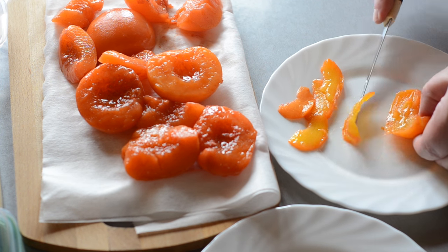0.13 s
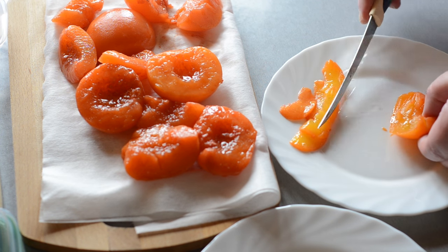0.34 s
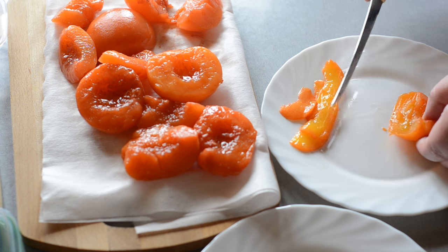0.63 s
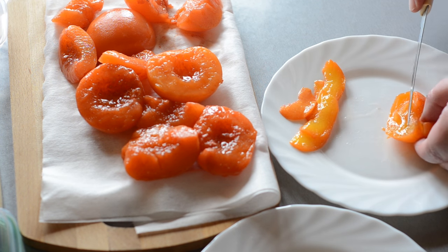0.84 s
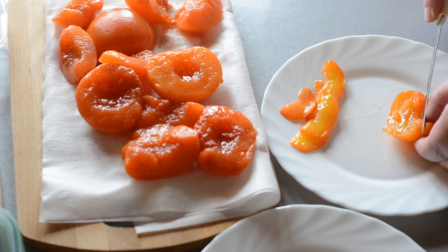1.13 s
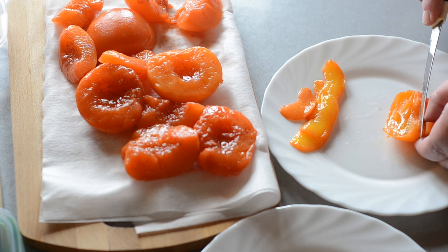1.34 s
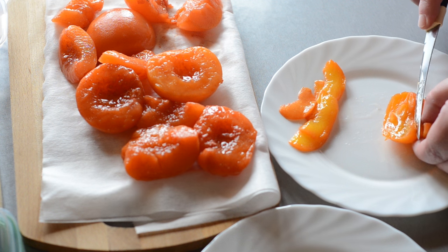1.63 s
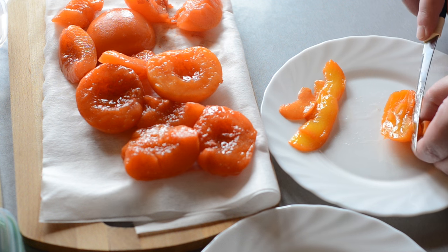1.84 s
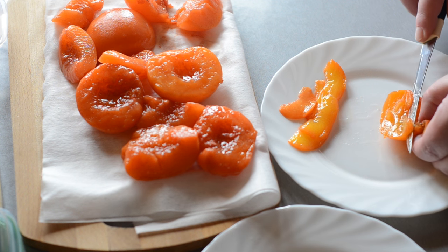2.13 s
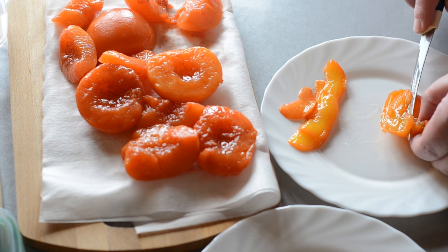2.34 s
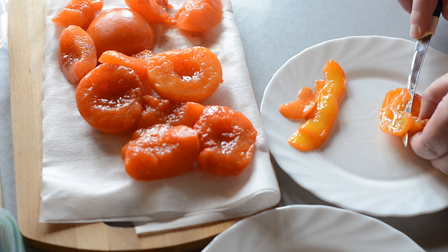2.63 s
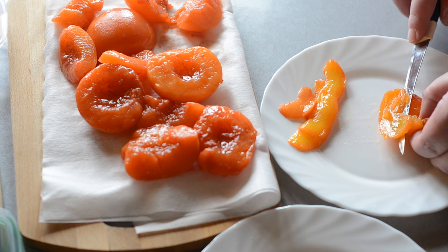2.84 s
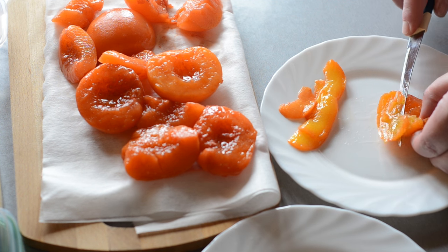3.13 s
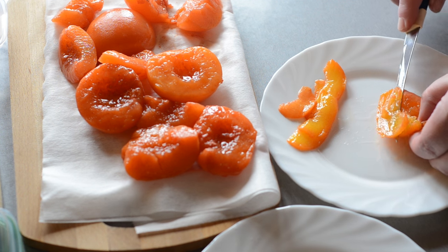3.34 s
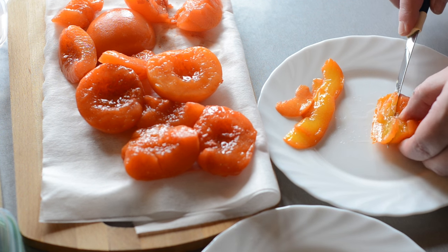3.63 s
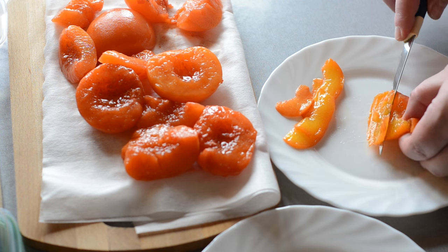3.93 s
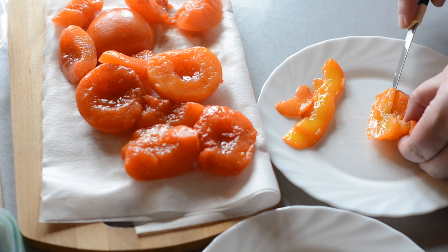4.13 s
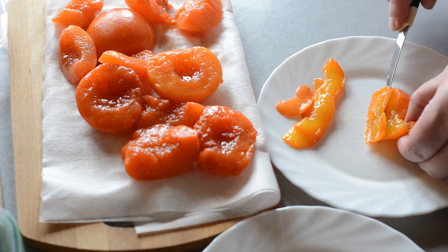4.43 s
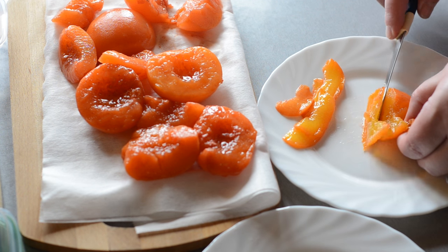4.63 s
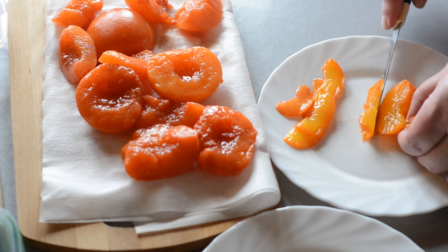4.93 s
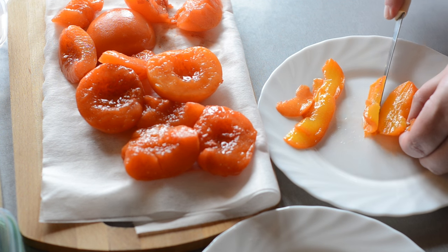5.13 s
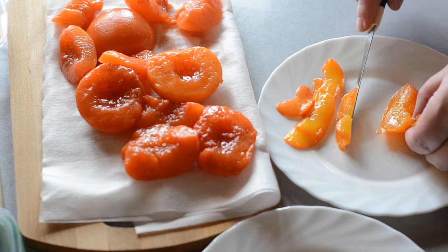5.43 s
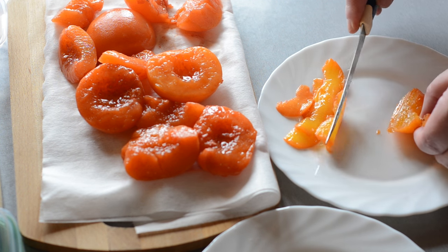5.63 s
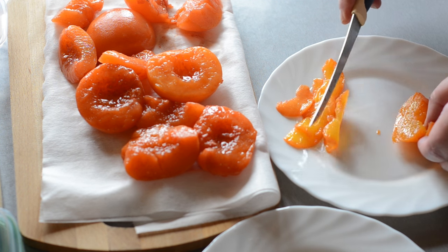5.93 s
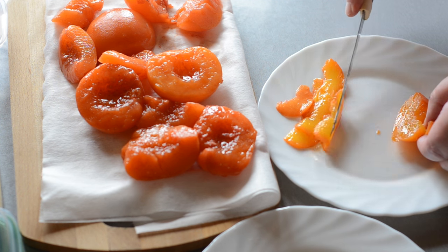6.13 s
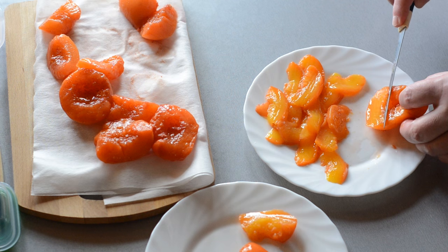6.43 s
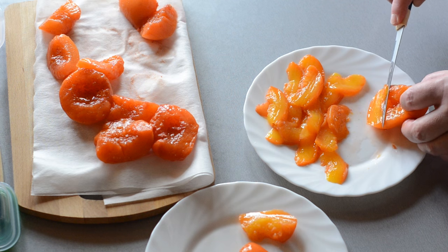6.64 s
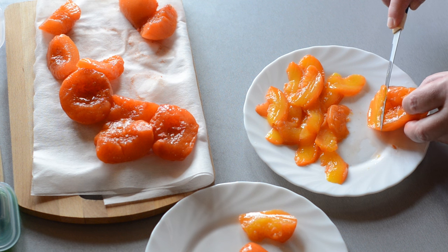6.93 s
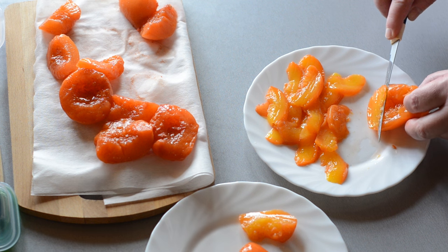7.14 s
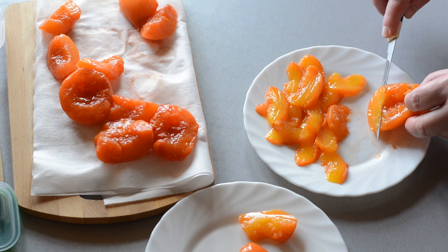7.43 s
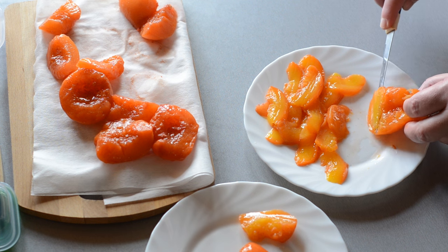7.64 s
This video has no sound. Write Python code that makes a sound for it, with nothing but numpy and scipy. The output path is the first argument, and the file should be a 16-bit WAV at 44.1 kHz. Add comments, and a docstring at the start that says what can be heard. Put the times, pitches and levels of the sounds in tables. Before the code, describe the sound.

Close up in a small quiet kitchen, a knife blade clinks on a ceramic plate and scrapes briefly. Soft, wet sawing strokes follow in short rhythm, with a small clink midway. A loud, double-edged knock lands as the blade cuts through, then thin scrapes drag the slice aside. Quieter sawing resumes with tiny juicy clicks over smooth room hiss.

```python
"""Slicing soft fruit on a plate

A knife saws through soft fruit on a ceramic plate in a small quiet kitchen.
Blows are fading tones plus a thud; sawing and scraping are gritty noise, shaped or sent through resonances.
Juice clicks are very short tones, and a burst of random echoes makes the room.
Behind them lie smooth noise and a faint high whine; the recorder cuts narrow notches and the top treble."""
import sys
import numpy as np
from scipy import signal
from scipy.fft import rfft, irfft
from scipy.io import wavfile

SR = 44100
rng = np.random.default_rng(int(sys.argv[2]) if len(sys.argv) > 2 else 0)


def wrap_up_sound(samples):
    """Save the sound to the file named by the first command line argument, as 16-bit audio."""
    columns = np.atleast_2d(samples).T
    # keep every value between -1 and 1, then stretch to whole-number steps
    tamed = np.clip(columns, -1, 1)
    steps = np.round(tamed * 32767).astype(np.int16)
    wavfile.write(sys.argv[1], SR, steps)


N = 343098  # length in samples
LEAD = 4410  # samples kept before time zero, so that an earlier blow is already ringing

# Blows: the blade on the glaze rings the plate, and the plate on the counter thuds.
# Each row: start in seconds, ring level in dB, ring brightness in dB per octave,
# place struck (0 middle to 1 foot), damping by fruit and counter (a factor on the decay rate),
# crack level in dB before its filter, thud level in dB before the bass cut.
BLOWS = [(-.04, -31.5, 2.5, 0.4, 1.1, -24, -20), (.021, -34, -4, 1, 1.5, -55, -21.5),
         (.026, -26, -6, 0.57, 2.5, -60, -14), (.047, -42.5, -6, 0.38, 1.1, -58, -42),
         (1.7037, -41.5, -1.8, 0.27, 1.5, -66, -35), (3.2735, -27.5, 0, 0.12, .9, -24, -22),
         (3.279, -48, 3.5, 0.037, .9, -55, -26), (3.8955, -39.5, -1.6, 0.24, 1.5, -63, -36),
         (4.5684, -25.5, 1.5, 0.39, 1.3, -17, -12.5), (4.582, -41, 4.5, .6, 1.1, -30, -12.5),
         (4.6551, -23, -0.5, 0.75, 2.5, -29, -0.5), (4.660, -13, -6, 0.73, 3.5, -51, -4.5),
         (4.677, -31, 2, 0.64, 1.5, -33, -11), (4.683, -26, -1, 0.5, 1.5, -44, -4),
         (4.690, -26, -7, 0.91, 1.1, -52, -17), (4.715, -47, -4, 0.67, 1.1, -50, -42),
         (5.311, -57, -5.5, 0.29, 1.1, -61, -51)]
# The plate's modes, its natural tones. Each entry: pitch in Hz.
PLATE_HZ = [222, 269, 339, 453, 500, 620, 760, 853, 1060, 1165, 1365, 1423, 1622, 1800, 2033, 2205, 2842,
            3220, 3914, 4200, 4700, 5075, 5230, 6420, 7630, 7860, 9060, 9410, 11150, 13000]
# How those modes answer, in the same order. Each row: relative level in dB struck in the middle,
# relative level in dB struck at the foot, seconds to fade by 60 dB before damping.
PLATE_MODES = [(-21, -30, 0.57), (-19.5, -28.5, 0.44), (-10, -13.5, 0.086), (-10, -12, 0.32),
               (0, -7.5, 0.11), (3.5, 1, 0.061), (2, 0.5, 0.075), (-12, -3.5, 0.2), (-14.5, -27, 0.14),
               (5.5, -9.5, 0.039), (-7, -9, 0.11), (-0.5, 9.5, 0.039), (-3.5, -7, 0.029), (-5, -8, 0.027),
               (4.5, 3.5, 0.031), (-16.5, -2.5, 0.057), (1, -1, 0.03), (-2, -12, 0.049), (-5.5, -48, 0.2),
               (-2, -6, 0.025), (-11.5, 4.5, 0.023), (-4, -16, 0.04), (-12, 9, 0.022), (-4.5, -2.5, 0.028),
               (-19, -11, 0.074), (-14, -6.5, 0.02), (-30, -11, 0.041), (-18.5, -26, 0.053),
               (-31, -30.5, 0.061), (-38, -52, 0.032)]
# Colour of the counter under a blow. Each row: frequency in Hz, relative level in dB.
THUD_COLOUR = [(100, -40), (200, -30.5), (400, -7.5), (800, 1.5), (1400, 3), (2100, 0.5), (2800, -8),
               (5000, -29), (9000, -42), (13000, -115)]
# How the kitchen's echoes fade. Each row: frequency in Hz, seconds to fade by 60 dB.
KITCHEN_FADE = [(200, 0.21), (700, 0.34), (2000, 0.29), (5000, 0.26), (10000, 0.16)]
# Colour of room tone and preamp hiss. Each row: frequency in Hz, relative level in dB.
AIR_COLOUR = [(10, -40.5), (22, -7), (38, -1), (52, -1.5), (90, 1), (150, -1), (300, -3), (600, 0),
              (1000, 0), (2000, -7), (4000, -13.5), (8000, -19), (12000, -27), (16000, -31)]
# The blade dragged sideways. Each row: time of full pressure in seconds, onset in seconds, fade in seconds,
# then levels in dB before mixing: edge chatter, mid-blade ring, squeak, ring near the handle.
SCRAPES = [(.072, 0.022, 0.16, -52, -52, -58.5, -60), (.163, 0.022, 0.066, -68, -70, -58.5, -56),
           (4.82, 0.051, 0.087, -60, -62, -60, -54), (4.99, .11, 0.051, -60, -61, -67, -60),
           (5.1, 0.065, 0.16, -61, -64, -67, -59), (5.26, .035, 0.066, -55, -55.5, -68, -58),
           (5.313, 0.02, 0.13, -54.5, -54.5, -56, -46.5), (5.455, 0.076, 0.078, -70, -62, -57.5, -64)]
# The blade's resonances. Each row: pitch in Hz, width in Hz of one filter pass, relative level in dB.
BLADE = [(1820, 490, -1), (1894, 490, 1), (3403, 840, -6), (3450, 340, -13.5), (4160, 900, 7),
         (4660, 500, 2.5), (5120, 880, 9), (6180, 160, -0.5), (7310, 150, 4.5), (7730, 400, -8),
         (7950, 380, 8), (10110, 450, -4), (10670, 120, -15)]
# Fading of the blade's four groups. Each entry: share of the drag's fade, in the order of the levels above.
LINGER = [1, 1.17, 1.08, 0.41]
# Wet clicks of juice and skin. Each row: start in seconds, level in dB, pitch in Hz, seconds to fade by 60 dB.
CLICKS = [(.061, -45, 8900, 0.0014), (1.864, -47, 7000, .003), (3.672, -34.5, 5500, 0.0016),
          (4.216, -34.5, 5540, 0.0033), (4.252, -32.5, 5100, .003), (4.2522, -52, 12000, 0.0011),
          (4.429, -48, 10600, 0.0026), (4.812, -40, 4700, .006), (5.454, -46, 3260, 0.029),
          (6.633, -57.5, 8150, 0.022), (6.8044, -45, 2500, 0.013), (6.807, -45.5, 2800, 0.053),
          (6.807, -48, 4020, 0.025), (6.874, -54, 7700, .004), (6.874, -52, 2300, .01),
          (6.889, -49, 2400, 0.016), (6.892, -53, 9700, .004)]
# Saw strokes through the flesh. Each row: time of full speed in seconds, speeding up in seconds,
# slowing down in seconds, hiss level in dB before mixing.
STROKES = [(.66, .09, 0.094, -71), (1.822, 0.028, 0.12, -62), (1.985, .035, 0.073, -61.5),
           (2.162, 0.075, 0.083, -62.5), (2.338, 0.084, 0.063, -63.5), (2.488, 0.045, .12, -64.5),
           (2.696, .09, 0.068, -62.5), (2.845, 0.056, 0.11, -64.5), (3.015, 0.09, 0.13, -64),
           (3.2, 0.077, 0.092, -61.5), (3.565, 0.11, 0.055, -63), (3.99, 0.058, 0.071, -67),
           (4.1, .05, 0.085, -58.5), (4.262, 0.049, 0.18, -60), (4.455, 0.069, 0.095, -53.5),
           (6.04, .1, .12, -72), (6.44, .06, 0.2, -66), (6.76, .03, 0.13, -64.5), (6.888, 0.032, .14, -66),
           (7.112, 0.062, .12, -66.5), (7.305, 0.09, .04, -66), (7.48, .12, 0.12, -64),
           (7.628, 0.037, 0.084, -70)]
# Colour of the sawn flesh. Each row: frequency in Hz, relative level in dB.
FLESH_COLOUR = [(900, -8), (1500, -5), (2300, -10), (4500, -13.5), (6500, -13.5), (8200, -12), (9500, -16),
                (11000, -27), (14000, -45)]
# Teeth reaching the glaze. Each row: time of full contact in seconds, onset in seconds, fade in seconds,
# level in dB before mixing.
RUBS = [(1.92, .025, 0.058, -60.5), (1.983, .025, 0.066, -60), (2.33, 0.044, .06, -71),
        (4.085, 0.019, 0.076, -54.5), (4.393, .015, .025, -58.5), (7.46, 0.043, 0.08, -69),
        (7.62, 0.026, .03, -67)]
# Notches at three whines. Each row: frequency in Hz, width in Hz, gain left at the centre.
WHINE_NOTCHES = [(5720, 480, 0.162), (6920, 160, .2), (14800, 450, 0.224)]


def gain_of(db):
    """Turns decibels into an amplitude factor."""
    return 10 ** (np.asarray(db) / 20)


def evened(x):
    """Scales a sound to an rms (average strength) of 1."""
    return x / np.sqrt(np.mean(x ** 2) + 1e-20)


def read(points, hz):
    """Reads a table's value at any frequency, with straight lines on a log-frequency axis."""
    f, value = np.transpose(points)
    return np.interp(np.log(hz + 1), np.log(f + 1), value)


def add(mix, s, sound):
    """Mixes a sound in at time s, in seconds."""
    part = mix[round(s * SR):][:len(sound)]
    part += sound[:len(part)]


def coloured(x, points):
    """Gives noise a spectrum, at rms 1."""
    hz = np.fft.rfftfreq(len(x), 1 / SR)
    return evened(irfft(rfft(x) * gain_of(read(points, hz)), len(x)))


def resonate(x, hz, width):
    """Passes a sound through one resonance, with gain 1 at its centre."""
    r = np.exp(-np.pi * width / SR)
    return 2 * signal.lfilter([1 - r], [1, -r * np.exp(2j * np.pi * hz / SR)], x).real


def ring_on(x, hz, width):
    """Passes a sound through the same resonance twice, at rms 1."""
    return evened(resonate(resonate(x, hz, width), hz, width))


def grit(spread_db):
    """Makes noise of uneven grains: the tiny catches of a sliding edge."""
    grain = 64  # samples
    grain_db = spread_db * np.repeat(rng.standard_normal(N // grain + 1), grain)[:N]
    return evened(rng.standard_normal(N) * gain_of(grain_db))


def swells(rows, linger=1, level_column=3):
    """Makes a gain over time: each movement rises along a squared sine to its peak and falls again."""
    t, out = np.arange(N) / SR, np.zeros(N)
    for row in rows:
        peak, rise, fall = row[:3]
        turn = np.interp(t, [peak - rise, peak, peak + fall * linger], [0, .5, 1])
        out += gain_of(row[level_column]) * np.sin(np.pi * turn) ** 2
    return out


def thud_pulse(size):
    """The counter's answer to one push: a pulse of the thud colour that starts at once, peak 1."""
    log_gain = read(THUD_COLOUR, abs(np.fft.fftfreq(size, 1 / SR))) * np.log(10) / 20
    pulse = np.fft.ifft(np.exp(signal.hilbert(log_gain).conj())).real  # nothing sounds before the push
    return pulse / abs(pulse).max()


def crack_noises(size):
    """Steel skids a moment on glaze: one short noise burst for each blow."""
    t = np.arange(size) / SR
    bursts = rng.standard_normal((len(BLOWS), size)) * gain_of(-60 * t / 0.009)  # gone in about 9 ms
    return signal.sosfilt(signal.butter(5, [2500, 9000], "band", fs=SR, output="sos"), bursts)


def blows():
    """Each blow sets off the plate's modes at the place struck, with a crack, and thuds in the counter."""
    t = np.arange(SR // 3) / SR
    ring, thud = out = np.zeros((2, N + LEAD))
    hz = np.array(PLATE_HZ)[:, None]
    middle_db, foot_db, t60 = np.transpose(PLATE_MODES)[:, :, None]
    contact_s = 0.0011
    contact = np.sin(np.pi / 2 * np.minimum(t / contact_s, 1)) ** 2  # the push builds up over the contact time
    pulse = thud_pulse(2048)
    spots_db = rng.standard_normal((len(BLOWS), len(PLATE_MODES), 1))  # each spot favours other modes
    for row, spot_db, crack in zip(BLOWS, spots_db, crack_noises(2048)):
        s, ring_db, bright_db, place, damping, crack_db, thud_db = row
        s = s + LEAD / SR
        place_db = middle_db + place * (foot_db - middle_db)
        mode_db = ring_db + place_db + bright_db * np.log2(hz / 1000) + spot_db
        modes = gain_of(mode_db - 60 * damping * t / t60) * np.sin(2 * np.pi * hz * t)
        add(ring, s, modes.sum(0) * contact)
        add(ring, s, gain_of(crack_db) * crack)
        add(thud, s, gain_of(thud_db) * pulse)
    bass_edge_hz = 215  # below this the plate is too small to radiate
    return signal.sosfilt(signal.butter(8, bass_edge_hz, "high", fs=SR, output="sos"), out)


def kitchen(x):
    """Sparse reflections of random sign answer each sound, each band fading at its own speed."""
    taps, gap = np.zeros(SR // 2), 20  # one reflection at random within every 20 samples
    at = np.arange(120, len(taps) - gap, gap)
    taps[at + rng.integers(0, gap, len(at))] = rng.choice([-1., 1.], len(at))
    hz, t, bands = signal.stft(taps, SR, nperseg=256)
    fade = gain_of(-60 * t / read(KITCHEN_FADE, hz)[:, None])
    tail = signal.istft(bands * fade, SR, nperseg=256)[1]
    return signal.oaconvolve(x, tail / np.linalg.norm(tail))[:len(x)]


def air():
    """Smooth room tone and hiss, with a faint electronic whine split into lines by the frame rate."""
    air_db, whine_hz, frame_hz = -60.5, 14970, 59
    t, k = np.arange(N) / SR, np.arange(-4, 8)[:, None]
    turns = (whine_hz + frame_hz * k) * t + rng.random(k.shape)
    whine = gain_of(-101 + 0.57 * abs(k - .5)) * np.sin(2 * np.pi * turns)
    return gain_of(air_db) * coloured(rng.standard_normal(N), AIR_COLOUR) + whine.sum(0)


def scrapes():
    """The dragged edge chatters into the blade's resonances; four groups answer by where the edge touches."""
    slip_db, slip_s = 1.5, 0.02  # the edge sticks and slips: typical depth, and how long a catch lasts
    slips = evened(signal.lfilter([1], [1, -np.exp(-1 / (slip_s * SR))], rng.standard_normal(N)))
    rub = grit(spread_db=1.5) * gain_of(slip_db * slips)
    rings = np.array([gain_of(db) * ring_on(rub, hz, width) for hz, width, db in BLADE])
    groups = np.split(rings, [2, 4, 7])[::-1]  # highest first: edge, mid-blade, squeak, near the handle
    out = np.zeros(N)
    for k, group in enumerate(groups):
        out += swells(SCRAPES, LINGER[k], level_column=k + 3) * evened(group.sum(0))
    return out


def clicks():
    """Small wet pockets pop, each a short damped tone."""
    t, out = np.arange(SR // 10) / SR, np.zeros(N)
    for s, db, hz, t60 in CLICKS:
        onset = np.minimum(t * hz / 0.76, 1)  # full after 0.76 of a cycle
        add(out, s, gain_of(db - 60 * t / t60) * np.sin(2 * np.pi * hz * t) * onset)
    return out


def sawing():
    """Each stroke hisses in the flesh; where the teeth reach the glaze the plate's upper modes sing along."""
    rub = grit(spread_db=-1.5)
    tilt_db = 5  # per octave: fine teeth favour the upper modes
    glaze = np.zeros(N)
    for hz, (_, _, t60) in zip(PLATE_HZ[14:], PLATE_MODES[14:]):
        middle_db = PLATE_MODES[PLATE_HZ.index(hz)][0]
        glaze += gain_of(middle_db + tilt_db * np.log2(hz / 1000)) * ring_on(rub, hz, 8 / t60)
    flesh = coloured(grit(spread_db=3), FLESH_COLOUR)
    return swells(STROKES) * flesh + swells(RUBS) * evened(glaze)


def scene():
    """Everything on the plate sounds directly and through the kitchen, over the room tone."""
    ring, thud = blows()
    rubbed = np.pad(scrapes() + sawing(), (LEAD, 0))
    pops = np.pad(clicks(), (LEAD, 0))
    direct = ring + thud + gain_of(-1.5) * rubbed + pops
    wet = kitchen(gain_of(-3) * (ring + thud) + gain_of(-7.5) * rubbed + gain_of(-5.5) * pops)
    return ((direct + wet)[LEAD:] + air())[None]


def record(dry):
    """Cuts notches at the first eight mains multiples and at three whines, then limits the treble."""
    mains_hz, edge_hz = 60, 15740
    hum_notches = [(mains_hz * k, 32, .2) for k in range(1, 9)]
    for hz, width, left in hum_notches + WHINE_NOTCHES:
        b, a = signal.iirnotch(hz, hz / width, SR)
        dry = signal.lfilter((1 - left) * b + left * a, a, dry)  # some of the sound is left at the centre
    treble_cut = signal.firwin(2047, edge_hz, window=("kaiser", 9), fs=SR)
    return signal.oaconvolve(dry, treble_cut[None], "same")


dry = scene()
out = record(dry)
wrap_up_sound(out)
```